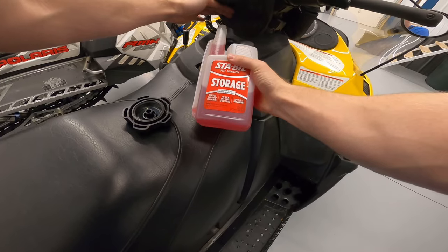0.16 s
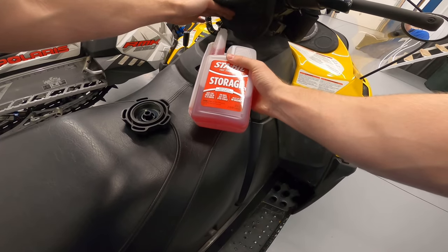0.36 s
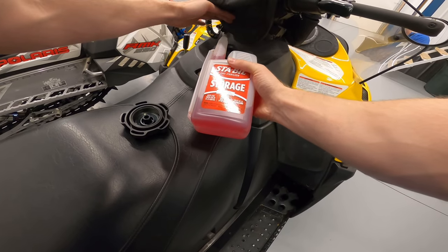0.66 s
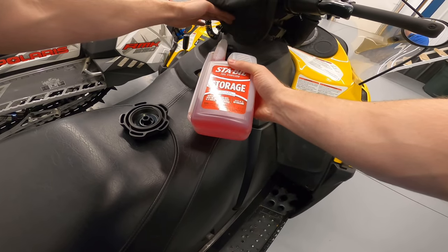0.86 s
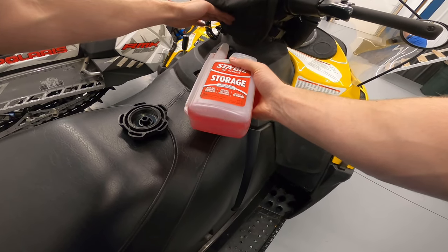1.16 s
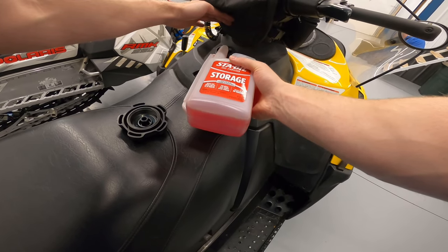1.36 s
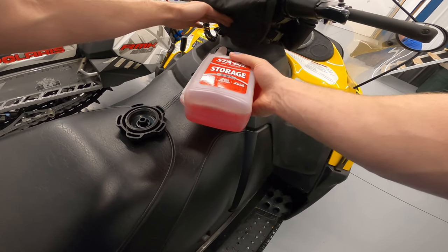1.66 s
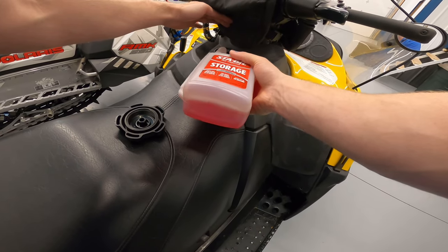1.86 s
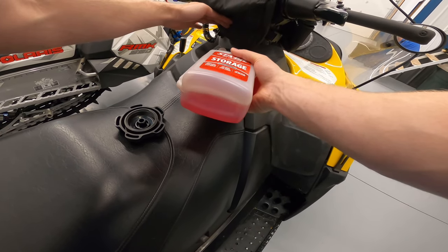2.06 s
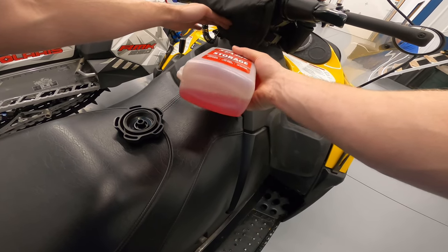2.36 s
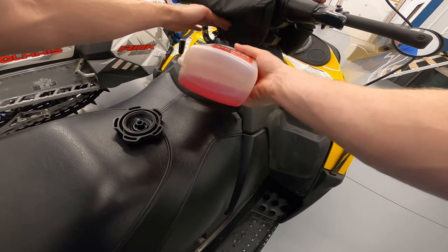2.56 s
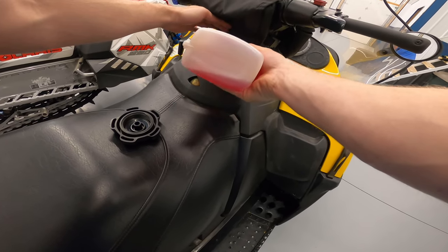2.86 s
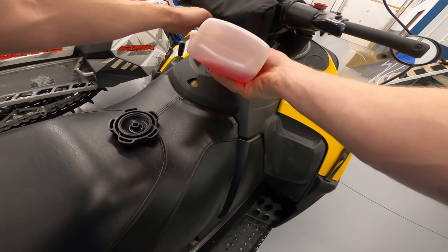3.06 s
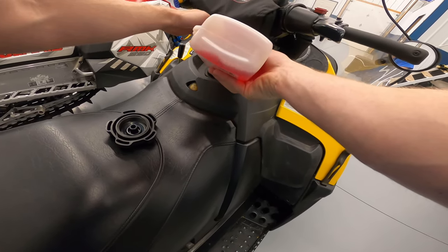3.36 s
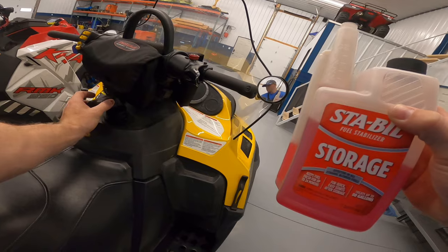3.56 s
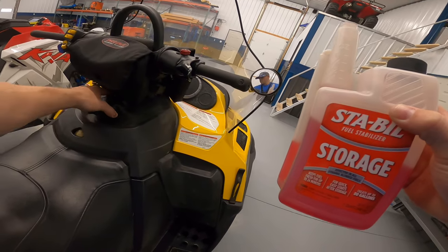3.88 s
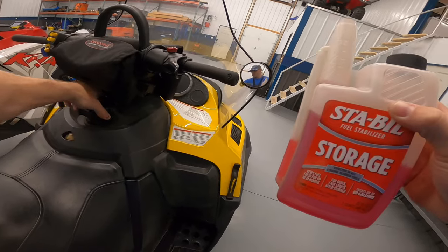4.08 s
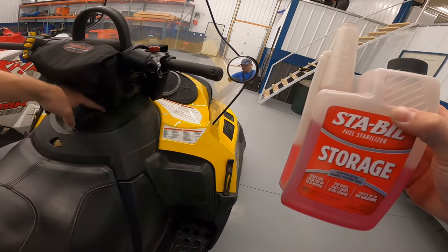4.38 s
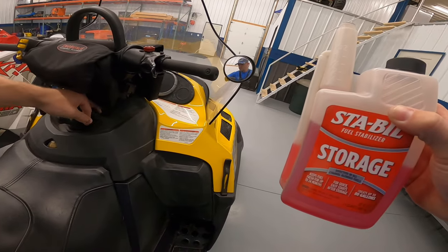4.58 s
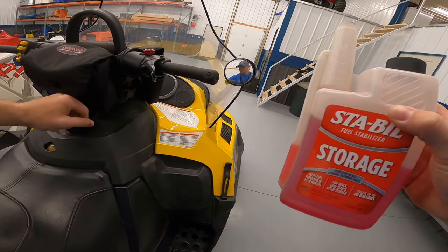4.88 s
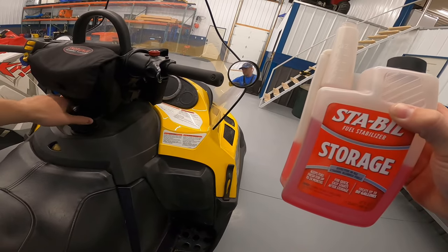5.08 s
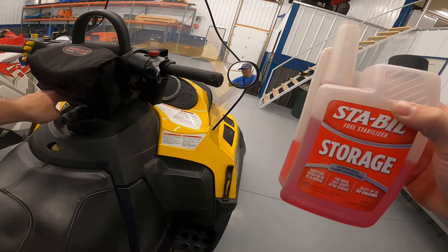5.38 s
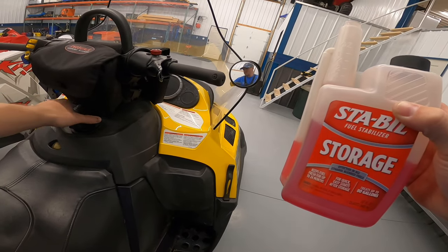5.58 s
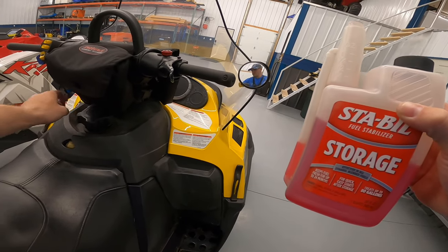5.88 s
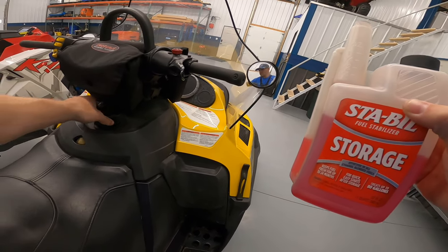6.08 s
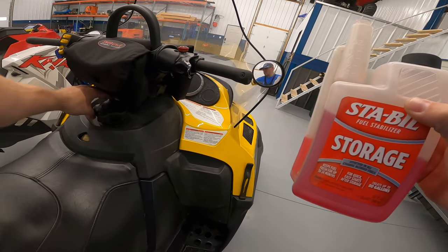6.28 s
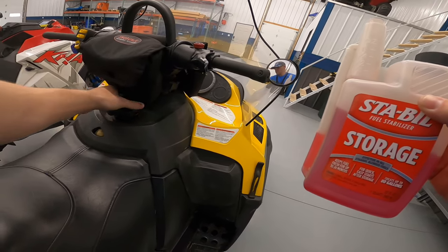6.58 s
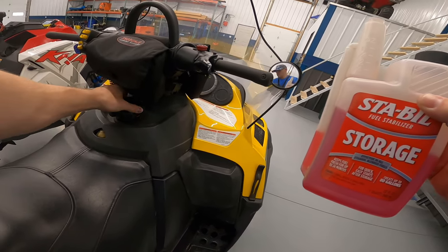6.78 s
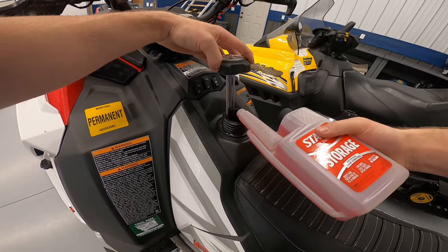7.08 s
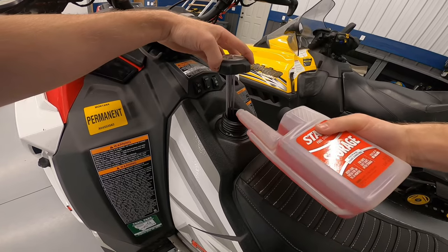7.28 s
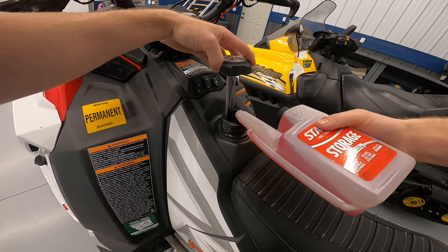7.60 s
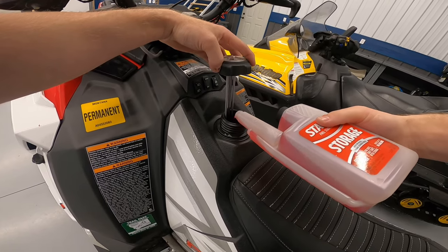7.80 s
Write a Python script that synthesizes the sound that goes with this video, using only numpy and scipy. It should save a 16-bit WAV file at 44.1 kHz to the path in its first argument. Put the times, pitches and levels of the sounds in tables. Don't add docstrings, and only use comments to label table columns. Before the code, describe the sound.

Thin liquid splashes briefly into a hollow tank, a plastic cap is screwed on with loud knocks and snaps, then a glugging pour.

```python
import sys
import numpy as np
from scipy import signal
from scipy.fft import rfft, irfft, next_fast_len
from scipy.io import wavfile
from scipy.ndimage import uniform_filter1d

SR = 44100
rng = np.random.default_rng(int(sys.argv[2]) if len(sys.argv) > 2 else 0)


def to_wav(s):
    ch = np.atleast_2d(s).T
    pcm = np.round(np.clip(ch, -1, 1) * 32767)
    wavfile.write(sys.argv[1], SR, pcm.astype(np.int16))


def convert_level_to_amplitude(level_db):
    exponent = np.asarray(level_db, float) / 20
    return 10 ** exponent


N = 350154

# time_s, fizz_db, gurgle_db
POURS = [
    [(2.09, -69.5, -91), (2.31, -57.5, -62), (2.5, -79.5, -78)],
    [(3.103, -59.5, -52.5), (3.336, -57.5, -71), (3.56, -63, -68)],
    [(7.22, -70, -70), (7.3, -68, -66.5), (7.37, -66, -64), (7.49, -56, -63.5), (7.68, -62.5, -66),
     (7.77, -72, -64), (7.81, -58.5, -62), (7.94, -55.5, -66)],
]
# freq_hz, level_db (per Hz)
FIZZ = [(1060, -33), (1750, 3), (2180, -26), (2690, -9), (3710, -8.5), (6070, -5), (6900, -6.5),
        (12700, -16.5), (14700, -21), (16000, -58)]
# start_s, peak_db, bubble_hz
SMALL_DROPS = [(2.1804, -42, 7500), (2.229, -44.5, 4770), (2.2894, -48, 7200), (3.2665, -28.5, 6020),
               (3.3503, -33, 6100), (3.3877, -29, 5530), (3.499, -44, 4430), (7.296, -34, 5780),
               (7.3244, -56, 6320), (7.4455, -40, 6050), (7.4934, -35.5, 5360), (7.5716, -33.5, 7570),
               (7.6254, -44, 5640), (7.664, -34, 6160), (7.7937, -48, 5450), (7.871, -39.5, 5650),
               (7.9173, -42, 4450)]
MEDIUM_DROPS = [(2.2094, -49, 2050), (2.309, -52, 2050), (2.339, -35, 4630), (2.7008, -55, 1720),
                (3.1497, -40.5, 3180), (3.237, -43, 1660), (3.4293, -43, 2760), (7.2357, -45.5, 3430),
                (7.442, -37.5, 2530), (7.4963, -40, 2720), (7.6692, -37, 1780), (7.7976, -54.5, 1680),
                (7.9204, -36.5, 3870)]
LARGE_DROPS = [(2.218, -51, 330), (2.371, -46.5, 574), (2.443, -48.5, 433), (3.205, -40, 650),
               (3.222, -45, 406), (7.225, -49, 513), (7.37, -56, 433), (7.57, -52, 660), (7.86, -52, 404),
               (3.366, -47.5, 1040), (3.479, -43, 800), (7.805, -53, 457), (7.887, -38, 396)]
# start_s, peak_db, bubble_hz
SPLASH_BUBBLES = [(2.22, -53, 990), (2.31, -48, 3040), (2.335, -45, 6400), (3.112, -50, 2800),
                  (3.14, -43.5, 4120), (3.21, -44, 1170), (3.375, -47, 1755), (3.388, -38, 4400),
                  (7.375, -53, 2840), (7.52, -57, 2720), (7.55, -58, 1800), (7.665, -38.5, 2650),
                  (7.666, -36.5, 4740), (7.668, -46, 3460), (7.69, -57, 1030)]
# start_s, peak_db, bubble_hz
SPRAY = [(7.281, -47, 5650), (7.298, -47.5, 4900), (7.299, -45, 7360), (7.325, -46.5, 8500),
         (7.415, -53, 5560), (7.43, -50, 7540), (7.48, -49, 8300), (7.495, -43, 4300), (7.52, -55, 2670),
         (7.574, -39.5, 6140), (7.575, -48, 8660), (7.6, -59, 4600), (7.666, -42, 7950),
         (7.795, -50.5, 3860), (7.796, -59, 7600), (7.836, -45, 4460), (7.826, -51, 8150),
         (7.89, -42, 4900), (7.89, -47, 2640), (7.92, -40, 6060), (7.922, -42, 8920)]
# freq_hz, t60_s
AIR_SPACE = [(400, 0.03), (800, 0.15), (2500, 0.19), (6000, 0.2), (9000, .08)]
# start_s, peak_db, pitch_hz
GLUGS = [
    (7.074, -46.5, 854),
    (7.148, -44.5, 1040),
    (7.214, -50.5, 930),
    (7.279, -46.5, 1040),
    (7.358, -48, 1074),
    (7.536, -44.5, 1100),
    (7.622, -42.5, 1090),
]
# start_s, peak_db, pitch_hz, length_s
POCKETS = [
    (7.492, -47, 1030, 0.074),
    (7.548, -49, 405, 0.04),
    (7.672, -48, 655, 0.063),
    (7.688, -61, 950, 0.057),
    (7.668, -49.5, 1700, 0.042),
]
# start_s, firmest_s, end_s, firmest_db
RUBS = [(0, 0.113, .126, -53), (3.631, 3.79, 3.9, -46.5), (3.951, 4.07, 4.27, -48.5),
        (4.226, 4.261, 4.35, -38.5), (4.288, 4.368, 4.43, -36), (4.386, 4.416, 4.5, -50.5),
        (4.52, 4.588, 4.66, -42.5), (4.617, 4.658, 4.75, -37.5), (4.749, 4.842, 4.93, -38.5),
        (4.901, 4.936, 4.97, -36.5), (4.951, 5.067, 5.125, -48), (5.017, 5.015, 5.04, -40.5),
        (5.075, 5.098, 5.092, -33), (5.19, 5.186, 5.234, -37), (5.346, 5.383, 5.6, -37.5),
        (5.755, 5.818, 5.84, -46), (5.82, 5.819, 5.94, -37), (5.914, 6.017, 6.028, -32.5),
        (6.257, 6.326, 6.42, -40.5), (6.42, 6.51, 6.52, -39), (6.724, 6.822, 6.92, -45),
        (6.906, 6.98, 6.998, -44.5), (3.595, 4.498, 5.58, -55), (5.301, 6.164, 7.17, -55.5)]
# freq_hz, level_db (per Hz)
THREAD = [(710, 8), (1200, 5), (1640, 9), (2040, 6.5), (2180, 8.5), (2380, 9), (2980, 3.5), (3550, -2.5),
          (4500, 6), (5410, 2), (6580, 1.5), (9500, -2.5), (12300, -32), (16000, -44)]
# freq_hz, width_hz, level_db
CAP = [(2360, 110, -28), (2970, 110, 5.5), (4400, 500, 22), (5090, 24, -34), (6110, 110, 7.5),
       (8050, 1500, 3)]
# start_s, peak_db, pitch_hz, treble_db
SNAPS = [
    (3.983, -48, 1700, -6),
    (4.169, -30.5, 1800, -22),
    (4.9335, -19.5, 2600, -7),
    (5.0533, -17, 2220, -15),
    (5.0918, -21.5, 1640, -3),
    (5.847, -26, 2640, -20),
    (6.185, -45, 2270, 2),
    (6.731, -34.5, 2360, -1.5),
    (6.87, -32.5, 1790, -5),
]
# start_s, peak_db, hardness_db
KNOCKS = [(3.709, -9, -19.5), (3.79, -16, -19), (3.9, -3, -13.5), (4.076, -8.5, -13.5), (4.172, -17.5, -25),
          (4.293, -14.5, -11), (4.851, -11, -16), (4.922, -17.5, -15), (4.954, -21.5, -20),
          (4.999, -21, -19), (4.54, -30.5, -18), (5.308, -25.5, -15), (5.415, -15, -19), (5.426, -5, -8.5),
          (5.66, -15.5, -10), (5.769, -19, -11.5), (5.821, -23.5, -17), (5.864, -23.5, -30),
          (5.936, -22, 6.5), (5.944, -12.5, 3), (6.2, -38, -25), (6.263, -28, -15), (6.329, -30.5, -10.5),
          (6.368, -26.5, -15), (6.399, -31.5, -22), (6.487, -17.5, -12), (6.519, -29, -15),
          (6.602, -30.5, -12), (6.68, -31.5, -13), (6.8, -28, -18)]
# freq_hz, level_db, t60_s
TANK = [(159.3, -6, 1), (226, 3.5, 0.12), (290, 4, 0.083), (338.8, -2.5, 0.081), (416, -2, 0.12),
        (485, -4, 0.11), (538.7, -10.5, 0.16), (606.6, -2.5, 0.054), (726, 2.5, 0.022), (898, -3, 0.054),
        (983, -3, 0.032), (1055, -18.5, 0.24), (1350, -33, 0.05), (1540, -17, 0.045)]
# time_s, level_db, upper_modes_db
TURNING = [(3.62, -64, -6), (3.72, -30.5, -15), (3.88, -35.5, -17), (5.15, -51, -12.5),
           (5.83, -33.5, -14.5), (6.05, -50.5, 0.5), (6.5, -43, -11), (6.75, -47.5, -10.5), (6.99, -54, -7)]
# start_s, peak_db, pitch_hz, treble_db
TICKS = [(0.3045, -60, 1700, 21), (0.3175, -29, 1680, -2), (0.3545, -37.5, 1140, -21),
         (0.385, -51, 2000, -10), (0.3645, -43.5, 2150, 7.5), (0.439, -50, 1740, -21),
         (0.504, -46.5, 1830, -34), (0.64, -40.5, 1830, -35), (0.792, -47.5, 999, -31),
         (1.029, -46, 2090, -20), (1.085, -49, 2330, 6), (1.755, -49.5, 1920, -10), (1.828, -53, 2090, -14),
         (1.843, -45, 1580, -25), (2.614, -70, 781, 20), (2.829, -36, 1900, -41), (3.239, -39.5, 1200, -21),
         (3.594, -42.5, 1670, 7.5), (4.537, -37, 2300, -33), (4.934, -18, 880, -48),
         (6.976, -46.5, 4470, 21)]
# start_s, peak_db, hardness_db
BUMPS = [
    (1.454, -14.5, -17.5),
]
# freq_hz, level_db, t60_s
BOTTLE = [(355, 11, 0.039), (423, 8.5, 0.057), (230, -4, 0.071), (528, 8, 0.061), (630, -7, 0.096),
          (730, 1, 0.52), (880, -23, 0.13), (960, 11, 0.057), (1120, -8, 0.36), (2550, -13, 0.05),
          (1490, -1, 0.078), (1520, -44, .08)]
# start_s, peak_db, hardness_db
THUDS = [
    (0.402, -42, -7),
    (1.314, -33.5, -16.5),
    (1.794, -39, -22),
]
# freq_hz, level_db, t60_s
SEAT = [(101, -1, 0.18), (146, 4.5, 0.22), (188, 5.5, 0.23), (247, 10, 0.062), (294, 1, 0.12),
        (348, -24, .08), (600, -9, 0.057), (820, -3, .06)]
# time_s, level_db, upper_modes_db
DRUMS = [
    [(1.3, -83, -21), (1.47, -53, -2), (1.6, -55.5, -9), (1.72, -61.5, -8), (1.8, -56, -10),
     (2.05, -84, -5)],
    [(2.7, -70, -18), (2.974, -62.5, -36), (3.422, -69, 6.5), (3.55, -66.5, 8.5)],
]
# freq_hz, t60_s
GARAGE = [(200, 0.28), (800, 0.31), (3000, 0.25), (9000, 0.11)]
# freq_hz, left_minus_right_db
LEAN = [(350, 1), (640, 4.5), (1400, 7), (2500, -.5), (4500, 3.5), (9000, -2)]
# freq_hz, lead_rad
LEAD = [(300, 0), (1900, .04), (4050, .6), (7750, -1.2), (10300, 1.9), (13200, .8)]
CUTS = [0, 3.552, 6.982, 8]
SHOT_PAN_DB = [-2.5, 0, -1.5]
# freq_hz, level_db (per Hz)
HUM = [(70, -37.5), (110, -49), (140, -13.5), (165, 3), (195, -9), (250, -15.5), (400, -21), (600, -27.5),
       (900, -27.5), (2300, -33.5), (5000, -38), (8000, -42.5), (11000, -54), (15000, -69)]
# freq_hz, likeness (0 to 1)
SAME = [(100, 0.11), (400, 0.13), (1500, 0.061), (6000, 0.042)]
# start_s, peak_db
JOLTS = [
    (0.35, -59),
    (1.36, -53),
    (3.92, -52),
    (4.18, -60),
    (4.93, -42),
    (5.44, -56),
    (5.98, -54.5),
    (6.37, -42),
    (6.849, -59),
    (7.05, -57.5),
]

GLUG_T60_S, GLIDE_PER_S = 0.062, 16.3
DULL_PER_DB, CAP_WIDEN = 0.61, 3.66
SWELL_DB, EASE_DB = 8, 6.5
ROCKING_S, CRACK_DB, CRACK_PER_HARD = 0.039, -9, 0.9
REBOUND_OVER_DB, REBOUND_S, REBOUND_DB, REBOUND_SOFTER_DB = -13, 0.024, -11, -10
UPPER_T60_S, LOW_RISE_CYCLES = 0.12, 0.3
FIRST_BLOW, BLOW_S = 1.4, 0.00012
HUM_DB = -57
HELD_DB, JOLT_RISE_DB_S, JOLT_FALL_DB_S = -72, 160, 82


def evened(x):
    return x / np.sqrt(np.mean(x ** 2) + 1e-20)


def read(points, hz):
    f, value = np.transpose(points)
    return np.interp(np.log(hz + 1), np.log(f + 1), value)


def coloured(x, points):
    count = x.shape[-1]
    size = next_fast_len(count, True)
    gain = convert_level_to_amplitude(read(points, np.fft.rfftfreq(size, 1 / SR)))
    return irfft(rfft(x, size) * gain, size)[..., :count]


def ring(x, hz, width):
    return signal.lfilter(*signal.iirpeak(min(hz, SR / 2.2), max(hz / width, 0.3), SR), x)


def grains(count, per_s, spread_db):
    size = convert_level_to_amplitude(spread_db * np.minimum(rng.exponential(1, count), 4)) * rng.standard_normal(count)
    return size * (rng.random(count) < per_s / SR)


def wander(count, spread_db, size):
    drift = uniform_filter1d(rng.standard_normal(count + size), size)
    drift = uniform_filter1d(drift, size // 2)[:count]
    return convert_level_to_amplitude(spread_db * np.clip(drift * np.sqrt(size), -2, 2))


def columns(rows):
    s, *cols = np.transpose(rows)
    t = np.arange(s[0], s[-1], 1 / SR)
    edge = signal.windows.tukey(len(t), min(1, 600 / len(t)))
    return s[0], [np.interp(t, s, c) for c in cols], edge


def inside_tank(length, t60):
    t = np.arange(length) / SR
    echoes = rng.standard_normal((3, length))
    return (echoes[2] + echoes[:2]) * convert_level_to_amplitude(-60 * t / t60)


def pour(rows):
    s, (fizz_db, gurgle_db), edge = columns(rows)
    count = len(edge)
    fizz = sum(ring(grains(count, 140, 4.6), hz, hz / 12) for hz in np.geomspace(2000, 13000, num=24))
    gurgle = sum(ring(grains(count, 130, 4.6), hz, hz / 16) / np.sqrt(hz)
                 for hz in np.geomspace(380, 2300, num=16))
    smear = inside_tank(4000, 0.1)
    fizz = evened(signal.oaconvolve(coloured(fizz, FIZZ)[None], smear)[:, :count])
    gurgle = evened(signal.oaconvolve(gurgle[None], smear)[:, :count])
    return s, (convert_level_to_amplitude(fizz_db) * fizz + convert_level_to_amplitude(gurgle_db) * gurgle) * edge


def drop(db, hz, t60, cycles):
    u = np.arange(int(3 * cycles * SR / hz)) * hz / SR / cycles
    bubble = np.sin(2 * np.pi * cycles * (u + 0.01 * u ** 2))
    bubble *= np.exp(-1.5 * u) * np.minimum(u * 6, 1)
    echoes = inside_tank(9000, max(t60, 0.02))
    echoes[:, 0] = 7.0
    wet = signal.oaconvolve(bubble[None], echoes)
    return convert_level_to_amplitude(db - 4.5) * wet / abs(wet).max()


def glug(db, hz):
    t = np.arange(3500) / SR
    pitch = hz * (0.84 + GLIDE_PER_S * t + 0.6 * np.exp(-t / 0.0015))
    tone = np.sin(2 * np.pi * np.cumsum(pitch) / SR)
    tone *= convert_level_to_amplitude(-60 * t / GLUG_T60_S) * (1 - np.exp(-t / 0.00071)) ** 2
    blur = rng.standard_normal(1500) * convert_level_to_amplitude(-14 - 60 * t[:1500] / 0.04)
    blur[0] = 1
    tone = signal.oaconvolve(tone, blur)
    return convert_level_to_amplitude(db) * tone / abs(tone).max()


def pocket(db, hz, length):
    t = np.arange(0, length, 1 / SR)
    pitch = hz * (0.96 + 0.092 * t / length) * wander(len(t), 0.26, size=300)
    swell = np.sin(np.pi * (t / length) ** 0.58) ** 0.7
    tone = np.sin(2 * np.pi * np.cumsum(pitch) / SR) * swell * wander(len(t), 2.2, size=400)
    blur = convert_level_to_amplitude(-8.5) * evened(inside_tank(3000, 0.06)) / 30
    blur[:, 0] = 1
    return convert_level_to_amplitude(db) * signal.oaconvolve(tone[None], blur)


def rub(start, firm, end, db):
    count = round((end - start) * SR)
    common, left, right = (grains(count, 14000, 1.5) for _ in range(3))
    slips = common + 0.81 * np.array([left, right])
    slips = coloured(slips, [(1500, 0), (9000, DULL_PER_DB * (db + 30.5))])
    shell = sum(convert_level_to_amplitude(mode_db) * wander(count, 6, size=2500) * evened(ring(slips, hz, width * CAP_WIDEN))
                for hz, width, mode_db in CAP)
    t = np.linspace(start, end, count)
    pressure = convert_level_to_amplitude(np.interp(t, [start, firm, end], [db - SWELL_DB, db, db - EASE_DB]))
    pressure *= signal.windows.tukey(count, min(1, 3200 / count))
    hiss = evened(coloured(slips, THREAD))
    return evened(hiss + 0.83 * evened(shell)) * pressure * wander(count, 1.1, size=500)


def snap(db, hz, treble_db):
    t = np.arange(900) / SR
    rattle = rng.standard_normal(len(t)) * convert_level_to_amplitude(-10 - 60 * t / 0.022)
    rattle[2] += 2.5
    body = ring(ring(rattle, hz, 1.1 * hz), hz, 1.43 * hz)
    edge = ring(ring(rattle, 5400, 7000), 5200, 9000)
    both = body / abs(body).max() + convert_level_to_amplitude(treble_db) * edge / abs(edge).max()
    return convert_level_to_amplitude(db) * both / abs(both).max()


def above(x, hz):
    return signal.sosfilt(signal.butter(3, hz, "high", fs=SR, output="sos"), x)


def knock(modes, db, upper_db, crack_db):
    t = np.arange(7000) / SR
    hz, mode_db, t60 = np.transpose(modes)[:, :, None]
    spot, tune = rng.standard_normal((len(modes), 2)).T[:, :, None]
    mode_db = mode_db + 0.41 * spot + (upper_db + 14.5) * (hz > 700)
    damped_t60 = 0.57 * t60.clip(0.02, np.where(hz > 700, UPPER_T60_S, 0.2))
    envelope = convert_level_to_amplitude(mode_db - 60 * t / damped_t60) * (1 - np.exp(-t * hz / LOW_RISE_CYCLES))
    shell = (envelope * np.sin(2 * np.pi * hz * (1 + 0.027 * tune) * t)).sum(0)

    contacts = rng.standard_normal(len(t)) * convert_level_to_amplitude(-60 * t / ROCKING_S)
    settling = uniform_filter1d(rng.standard_normal(len(t)), size=40)
    contacts += settling * convert_level_to_amplitude(-16 - 60 * t / 0.3)
    contacts *= 1 - np.exp(-t / 0.0019)
    contacts += FIRST_BLOW * np.exp(-(t / BLOW_S - 3) ** 2 / 2)
    shell = above(signal.oaconvolve(shell, contacts)[:len(t)], 1.273 * hz.min())

    crack = ring(coloured(rng.standard_normal(len(t)), THREAD), 2200, 3200)
    crack = evened(ring(crack, 2200, 5000)) * convert_level_to_amplitude(-60 * t / 0.024) * np.minimum(t / 0.0023, 1)
    return convert_level_to_amplitude(db) * (shell / abs(shell).max() + convert_level_to_amplitude(crack_db + 3.5) * crack)


def blow(shots, modes, s, db, hard_db):
    add(shots, s, knock(modes, db, hard_db, CRACK_DB + CRACK_PER_HARD * hard_db))
    if db > REBOUND_OVER_DB:
        blow(shots, modes, s + REBOUND_S, db + REBOUND_DB, hard_db + REBOUND_SOFTER_DB)


def drum(rows, modes):
    s, (low_db, upper_db), edge = columns(rows)
    jolts = grains(len(edge), 5000, 1.5) * wander(len(edge), 2.4, size=900)
    low, upper = np.zeros((2, len(edge)))
    for hz, db, t60 in modes:
        murmur = ring(ring(jolts, hz, max(5.55 / t60, 0.088 * hz)), hz, 280)
        band = low if hz < 700 else upper
        band += convert_level_to_amplitude(db) * evened(murmur)
    return s, convert_level_to_amplitude(low_db) * (evened(low) + convert_level_to_amplitude(upper_db) * evened(upper)) * edge


def tick(db, hz, treble_db):
    t = np.arange(700) / SR
    slip = rng.standard_normal(len(t)) * convert_level_to_amplitude(-60 * t / 0.019)
    body = ring(ring(slip, hz, 0.6 * hz), hz, 1.1 * hz) + 1.1 * ring(ring(slip, 700, 800), 700, 1200)
    edge = ring(ring(slip, 4500, 3500), 4500, 4000)
    return convert_level_to_amplitude(db) * (body / abs(body).max() + convert_level_to_amplitude(treble_db) * 0.45 * edge / abs(edge).max())


def add(shots, s, sound):
    part = shots[np.searchsorted(CUTS, s, "right") - 1][:, round(s * SR):][:, :sound.shape[-1]]
    part += sound[..., :part.shape[1]]


def ports(x):
    size = next_fast_len(N, True)
    hz = np.fft.rfftfreq(size, 1 / SR)
    half = convert_level_to_amplitude(read(LEAN, hz) / 2) * np.exp(0.5j * read(LEAD, hz))
    return irfft(rfft(x, size) * [half, 1 / half], size)[:, :N]


def panned(x, pan_db):
    return np.array([x * convert_level_to_amplitude(pan_db / 2), x * convert_level_to_amplitude(-pan_db / 2)])


def garage(x):
    taps = np.zeros((2, SR // 2))
    slots = np.arange(300, SR // 2 - 20, 20)
    at = slots + rng.integers(0, 20, (2, len(slots)))
    np.put_along_axis(taps, at, rng.choice([-1., 1.], at.shape), 1)
    hz, t, z = signal.stft(taps, SR, nperseg=512)
    same = np.clip(1.1 - hz / 3000, 0.3, 1)[:, None]
    z[1] = same * z[0] + np.sqrt(1 - same ** 2) * z[1]
    tail = signal.istft(z * convert_level_to_amplitude(-60 * t / read(GARAGE, hz)[:, None]), SR, nperseg=512)[1]
    return signal.fftconvolve(x.mean(0)[None], tail / np.linalg.norm(tail[0]), axes=1)[:, :N]


def hum():
    frames, hz = N // 256 + 5, np.fft.rfftfreq(1024, 1 / SR)
    a, b, c, d, patches = rng.standard_normal((frames, 513, 5)).T
    patches = evened(uniform_filter1d(uniform_filter1d(patches, size=14, axis=0), size=10, axis=1))
    same, left = np.clip(read(SAME, hz), -1, 1)[:, None], a + 1j * b
    z = np.array([left, same * left + np.sqrt(1 - same ** 2) * (c + 1j * d)])
    z *= convert_level_to_amplitude(read(HUM, hz)[:, None] + 1.8 * patches)
    low_cut = signal.butter(2, 95, "high", fs=SR, output="sos")
    air = signal.sosfilt(low_cut, signal.istft(z, nperseg=1024, noverlap=768)[1][:, :N])
    return convert_level_to_amplitude(HUM_DB) * evened(air)


def rumble():
    s, db = np.transpose(JOLTS)[:, :, None]
    late = np.arange(N) / SR - s
    jolts_db = (db - np.maximum(-JOLT_RISE_DB_S * late, JOLT_FALL_DB_S * late)).max(0)
    shake = rng.standard_normal((3, N))
    shake = shake[:2] + 0.3 * shake[2]
    shake = coloured(shake, [(10, 14), (28, 16), (85, 5), (130, -25), (400, -74)])
    return convert_level_to_amplitude(np.maximum(jolts_db, HELD_DB)) * evened(shake) * wander(N, 5, size=5000)


def scene():
    shots = np.zeros((3, 2, N))
    for rows in POURS:
        add(shots, *pour(rows))
    for table, cycles in ((SMALL_DROPS, 7), (MEDIUM_DROPS, 14), (LARGE_DROPS, 11),
                          (SPLASH_BUBBLES, 15), (SPRAY, 12)):
        for s, db, hz in table:
            add(shots, s, drop(db, hz, read(AIR_SPACE, hz), cycles))
    for row in RUBS:
        add(shots, row[0], rub(*row))
    for table, source in ((GLUGS, glug), (POCKETS, pocket), (SNAPS, snap), (TICKS, tick)):
        for s, *row in table:
            add(shots, s, source(*row))
    for table, modes in ((KNOCKS, TANK), (BUMPS, BOTTLE), (THUDS, SEAT)):
        for s, *row in table:
            blow(shots, modes, s, *row)
    add(shots, *drum(TURNING, TANK))
    for rows in DRUMS:
        add(shots, *drum(rows, BOTTLE))

    out, t = hum() + rumble(), np.arange(N) / SR
    for k, room_db in enumerate((-14, -14, -20)):
        near = ports(shots[k]) if k == 1 else shots[k]
        placed = near * panned(0.95, SHOT_PAN_DB[k])[:, None] + convert_level_to_amplitude(room_db) * garage(shots[k])
        out += placed * np.clip((CUTS[k + 1] - t) / 0.0026, 0, 1)
    return out


def low_pass(x):
    return signal.sosfilt(signal.butter(12, 16510, fs=SR, output="sos"), x)


def record(dry):
    soft = 1.83 * np.tanh(dry / 1.18)
    mix = signal.sosfilt(signal.butter(8, 14200, fs=SR, output="sos"), soft)
    return low_pass(mix)


dry = scene()
out = record(dry)
to_wav(out)
```